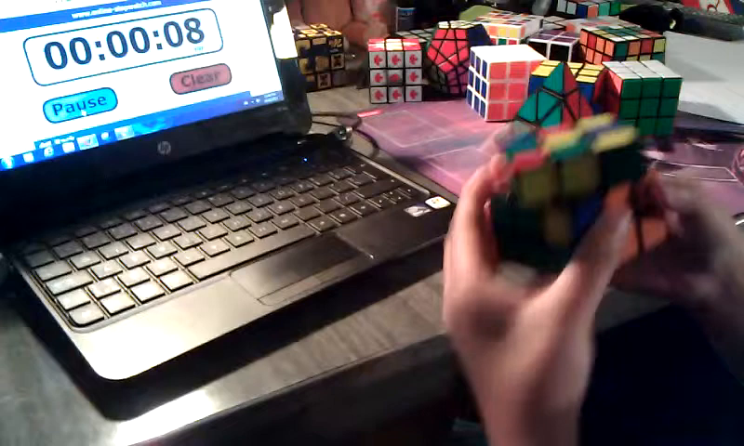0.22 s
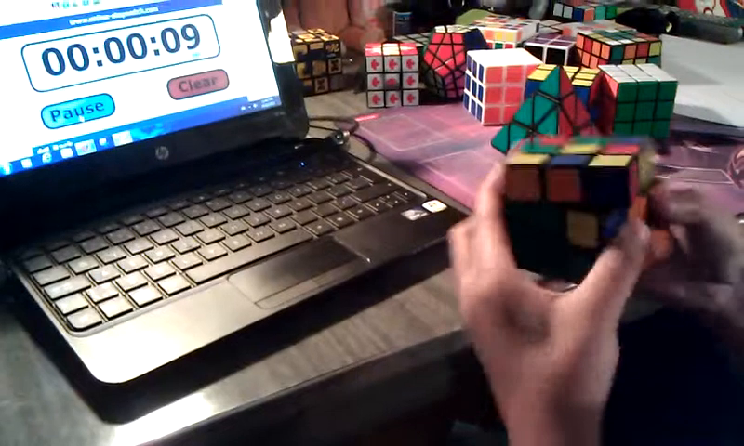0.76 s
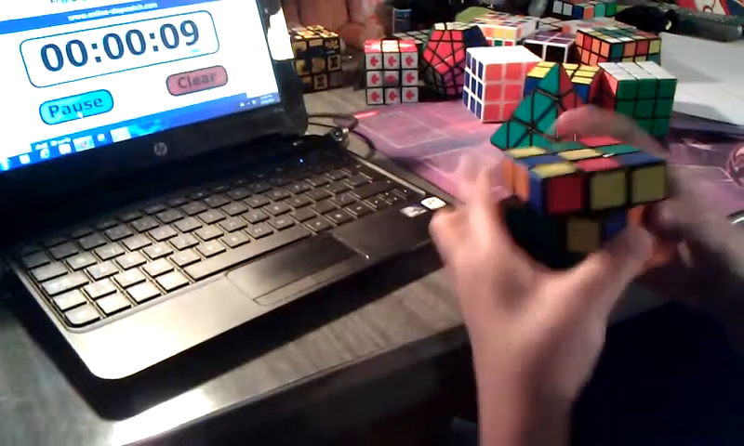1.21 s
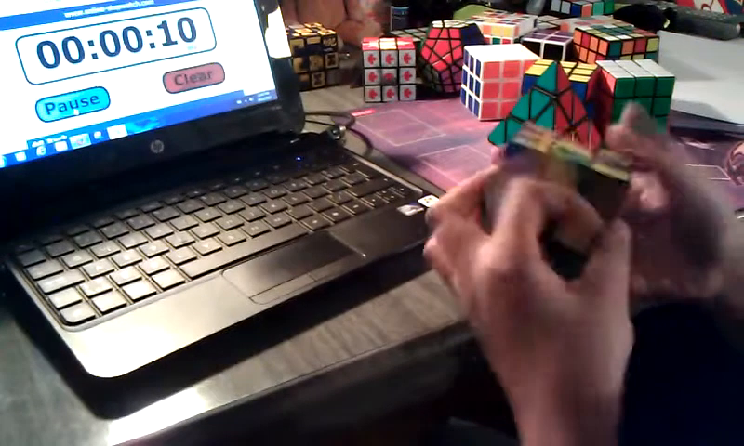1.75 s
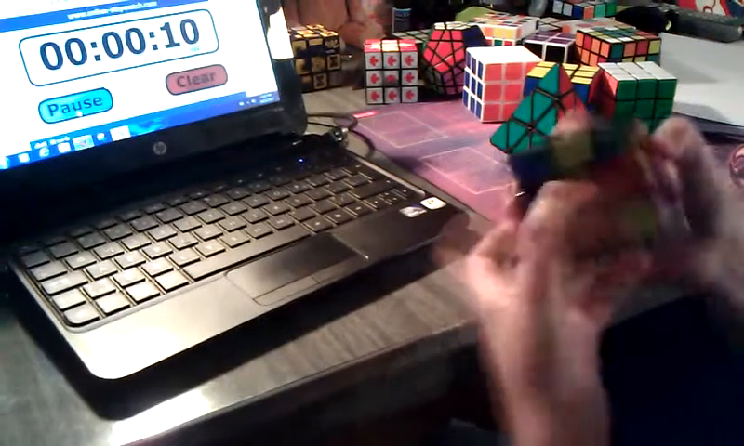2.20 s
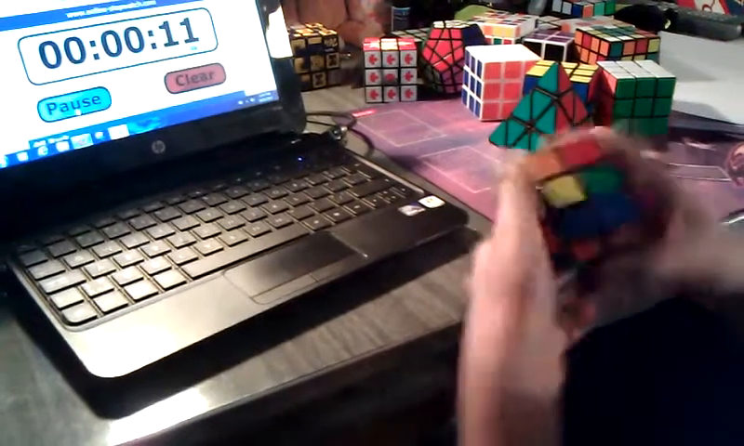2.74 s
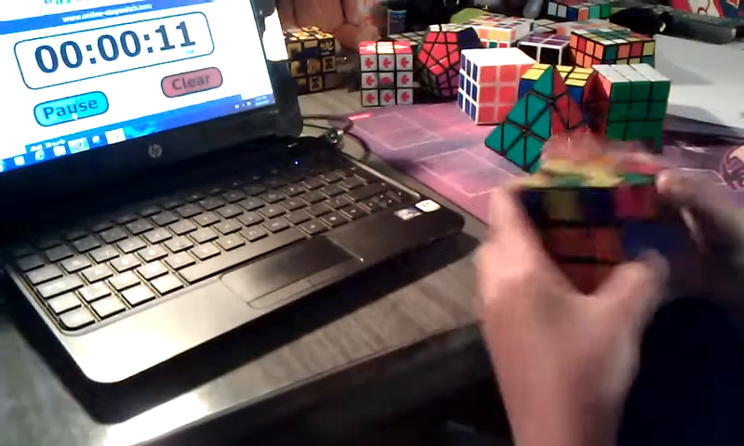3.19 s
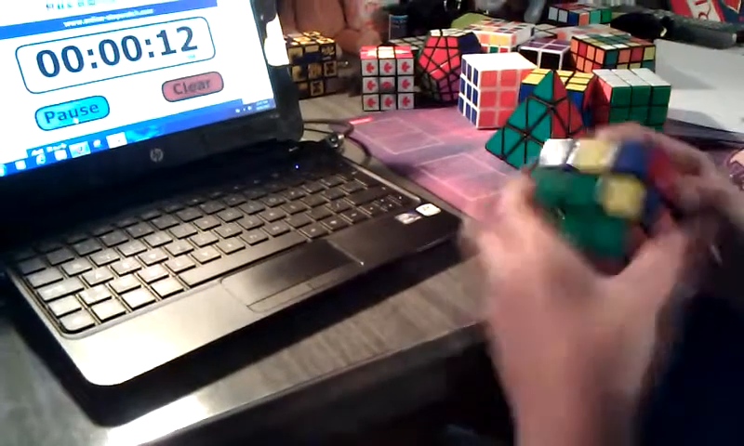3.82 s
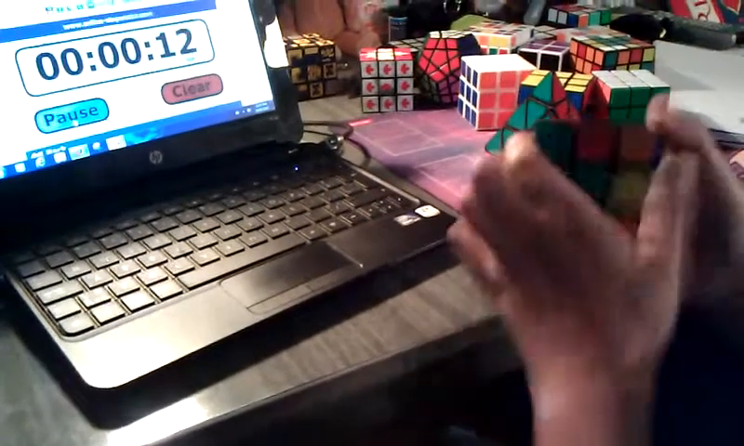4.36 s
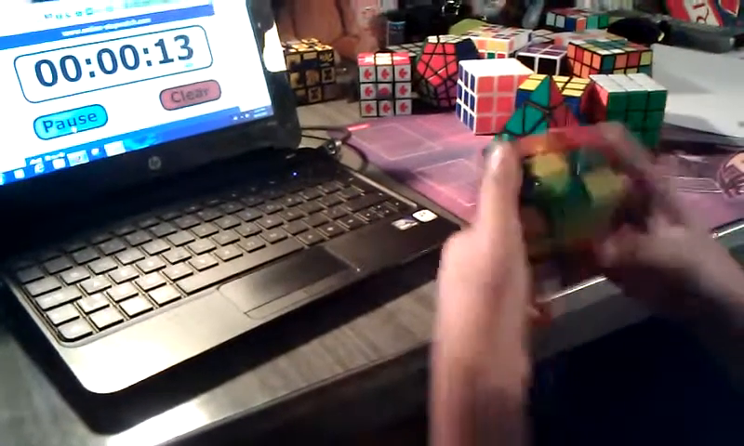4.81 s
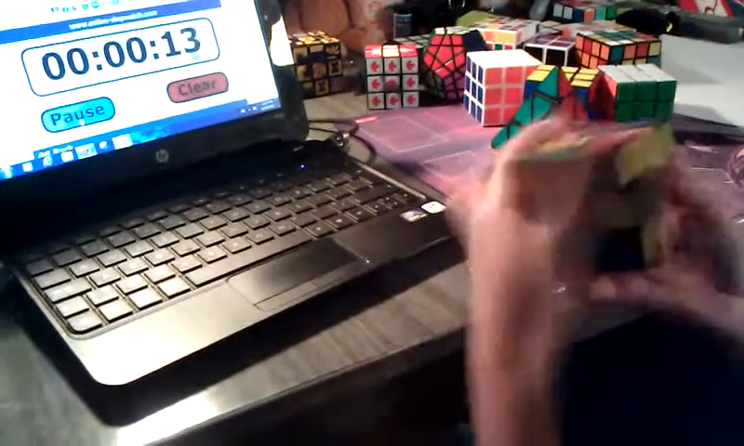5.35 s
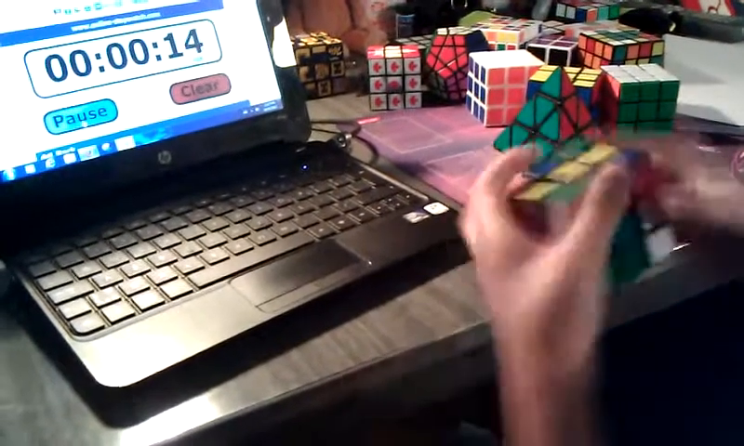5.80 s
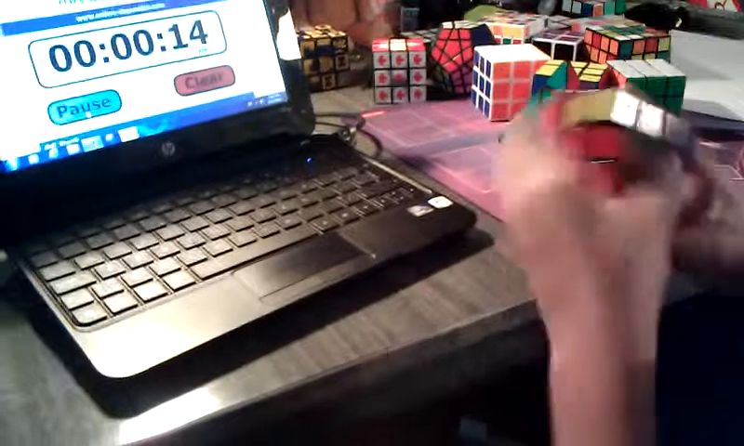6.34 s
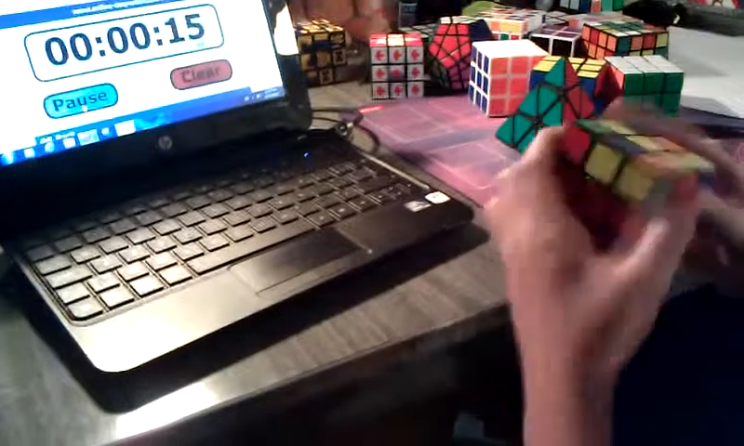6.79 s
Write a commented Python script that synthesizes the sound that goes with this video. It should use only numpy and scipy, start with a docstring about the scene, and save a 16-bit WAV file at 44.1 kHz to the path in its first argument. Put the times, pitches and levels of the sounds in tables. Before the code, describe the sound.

Fast plastic clicks, dry clacks and brief rasping slides come from a twisting puzzle cube, close up indoors over faint steady hiss.

```python
"""Fast clacks, scuffs and ticks over a fine rasp: a plastic puzzle cube turned by hand at a desk in a small room.
Each contact is a burst of force noise that rings the hollow pieces; the rasp is noise made of stick-slip bursts.
Loose pieces tick at random, and one pitched ring stands out at times.
Short echoes, a diffuse room tail and a faint hiss surround the cube. A narrow-band laptop microphone removes the
treble and overloads on the tallest peaks; soft low pulses stand for its overload at a few of the hardest clacks."""
import sys
import numpy as np
from scipy import signal
from scipy.fft import rfft, irfft, next_fast_len
from scipy.io import wavfile

SR = 44100
rng = np.random.default_rng(int(sys.argv[2]) if len(sys.argv) > 2 else 0)


def output_pcm(signal):
    """Save a mono or channel-first signal as 16-bit PCM at the path in sys.argv[1].

    Samples are clipped to [-1, 1] before scaling.
    """
    pcm = np.clip(np.atleast_2d(signal).T, -1, 1) * 32767
    wavfile.write(sys.argv[1], SR, np.round(pcm).astype(np.int16))


N = 311787


def from_db(db):
    """Decibels to amplitude gain."""
    return 10 ** (np.asarray(db) / 20)


def rms_one(x):
    """Scale each row to rms 1."""
    return x / np.sqrt(np.mean(x ** 2, axis=-1, keepdims=True) + 1e-20)


def at_hz(points, hz):
    """Read a spectrum, interpolating on a log-frequency axis."""
    known_hz, values = np.transpose(points)
    return np.interp(np.log(np.maximum(hz, 1)), np.log(known_hz), values)


def coloured(x, spectrum):
    """Filter a noise to a spectrum; rms 1."""
    size = next_fast_len(len(x))
    gain = from_db(at_hz(spectrum, np.fft.rfftfreq(size, 1 / SR)))
    return rms_one(irfft(rfft(x, size) * gain, size)[:len(x)])


def clicks():
    """Pieces snap cleanly against each other: a short scrape, a strong strike, a quick settling."""
    # clean snaps: first touch t/s, relative strength level/dB, hollow lows re peak level/dB
    snaps = [(0.153, -27.5, -24), (0.295, -27.5, -32), (0.386, -30, -33), (0.404, -26, -29),
             (0.48, -28, -30), (0.525, -9.5, -30), (0.533, -8, -40), (0.695, -27.5, -23),
             (0.803, -30.5, -22), (1.055, -30, -22), (1.109, -31.5, -8.5), (1.137, -28, -29),
             (1.255, -21, -40), (1.365, -24.5, -34), (1.393, -19, -19.5), (1.464, -22, -25),
             (1.493, -4.5, -28), (1.51, -6, -32), (1.619, -5.5, -32), (1.758, -10, -28),
             (1.782, -5.5, -24.5), (1.941, -12.5, -22), (1.967, -5, -30), (2.128, -23, -39),
             (2.2, -8.5, -26), (2.211, -8, -21), (2.247, -11.5, -30), (2.317, -23.5, -36),
             (2.379, -30.5, -31), (2.456, -25.5, -34), (2.481, -21.5, -41), (2.553, -22, -19.5),
             (2.623, -12, -30), (2.651, -10.5, -28), (2.697, -14.5, -42), (2.787, -19.5, -18.5),
             (2.837, -25, -33), (2.853, -13.5, -35), (3.011, -16, -25), (3.048, -18, -17.5),
             (3.269, -29.5, -25), (3.394, -25, -23), (3.703, -19.5, -22), (3.719, -17.5, -21),
             (3.946, -17.5, -27), (4.046, -30, -37), (4.133, -16, -27), (4.191, -8, -38),
             (4.346, -20.5, -26), (4.451, -17, -37), (4.477, -18, -31), (4.73, -26.5, -33),
             (4.865, -6, -29.5), (4.947, -24, -35), (5.031, -15, -27), (5.045, -15, -27), (5.142, -7, -34),
             (5.197, -36, -23), (5.218, -16, -24), (5.34, -5.5, -28), (5.549, -26.5, -19),
             (5.719, -24, -28), (5.789, -19, -24.5), (5.993, -8.5, -31), (6.137, -31, -22),
             (6.185, -18, -26.5), (6.253, -21, -31), (6.315, -8.5, -25), (6.332, -14, -47.5),
             (6.649, -25.5, -28.5), (6.889, -33, -19.5)]
    strikes = blows(snaps, seat_s=0.0013, bright_db=0)
    return contacts(strikes, level_db=-20.0, lead_db=-8.0, settle_s=0.0015, strike_db=15)


def scuffs():
    """Pieces catch and grind past each other for some milliseconds, with more scrape around the strike."""
    # grinding catches: first touch t/s, relative strength level/dB, hollow lows re peak level/dB
    grinds = [(0.048, -38, -8), (0.073, -30, -23), (0.545, -12, -35), (0.556, -9, -23),
              (0.589, -14.5, -25.5), (1.009, -35, -17), (1.186, -27.5, -18), (1.342, -18, -20.5),
              (1.429, -25, -28), (1.64, -15, -24), (1.657, -23, -19), (1.724, -10, -26), (1.96, -11.5, -24),
              (1.989, -16, -38), (2.18, -10, -26.5), (2.428, -20.5, -35), (2.87, -14, -46),
              (2.909, -4, -45), (2.986, -20.5, -34), (3.056, -9, -25.5), (3.496, -32, -21),
              (3.737, -18, -26), (4.001, -23.5, -36), (4.158, -23.5, -21), (4.181, -8, -26),
              (4.497, -5.5, -26.5), (4.52, -8.5, -30.5), (4.887, -8.5, -22.5), (4.891, -10, -38),
              (5.02, -16, -33), (5.118, -18.5, -30), (5.31, -16, -27), (5.83, -13, -30), (5.956, -7.5, -26),
              (6.278, -17, -26.5), (6.999, -19.5, -30)]
    strikes = blows(grinds, seat_s=0.0016, bright_db=0)
    return contacts(strikes, level_db=-19.5, lead_db=1, settle_s=0.0031, strike_db=13)


def ticks(pressure):
    """Loose pieces rattle lightly while the layers rub, ringing the same hollow shells."""
    return contacts(rattle(pressure), level_db=-7.0, lead_db=-8.5, settle_s=0.0019, strike_db=14.5)


def blows(table, seat_s, bright_db, plain_lows_db=-25.5, bright_per_db=0.27):
    """A piece strikes home just after first touch, the harder the brighter: rows (s, dB, hollow dB, bright dB)."""
    touch_s, peak_db, lows_db = np.transpose(table)
    highs_db = bright_db + bright_per_db * (peak_db - peak_db.mean())
    hollow_db = lows_db - plain_lows_db  # 0 for a contact that is neither hollow nor thin
    return np.transpose([touch_s + seat_s, peak_db, hollow_db, highs_db])


def rattle(pressure, hollow_db=1, bright_db=-3, colour_spread_db=4.5, count=900):
    """Random ticks follow the rubbing up to what their small weight allows: rows as in blows."""
    ticks_per_s, spread_db, top_db = 80, 2.5, -39
    s = np.cumsum(rng.uniform(0, 2, count)) / ticks_per_s  # uneven gaps
    strength, hollow, bright = rng.standard_normal((count, 3)).T
    rub_db = 20 * np.log10(np.interp(s * SR, np.arange(N), pressure))
    tick_db = np.minimum(rub_db, top_db) + spread_db * np.clip(strength, -2, 2)
    lows_db = hollow_db + colour_spread_db * hollow
    highs_db = bright_db + colour_spread_db * bright
    return np.transpose([s, tick_db, lows_db, highs_db])[s < N / SR]


def contacts(table, level_db, lead_db, settle_s, strike_db, vary_db=1.0, piece_spread=0.029,
             low_hz=1150, high_hz=4750, size=1024):
    """Every contact's force rings all the shell resonances, weighted by its hollow lows and bright highs."""
    # resonances of the hollow plastic pieces: nominal f/Hz, bandwidth f/Hz, relative level/dB
    shell = [(631, 117, -19), (877, 82, -18.5), (1213, 186, -16), (1983, 300, -8), (2616, 205, -7),
             (3344, 170, -9), (3830, 256, -7.5), (4640, 530, -6), (5416, 200, -12), (6358, 495, -2.5),
             (6718, 800, 0), (7492, 930, -3)]
    s, contact_db, hollow_db, bright_db = np.transpose(table)
    offsets = np.arange(size) - size // 4  # samples around the strike
    bins_hz = np.fft.rfftfreq(size, 1 / SR)
    force = rfft(chatter(offsets / SR, lead_db, settle_s, strike_db, count=len(s)))
    strength, detune = rng.standard_normal((len(s), len(shell), 2)).T
    rings = 0
    for k, (hz, width_hz, mode_db) in enumerate(shell):
        colour_db = hollow_db * (hz < low_hz) + bright_db * (hz > high_hz)
        gain = from_db(level_db + contact_db + mode_db + colour_db + vary_db * strength[k])
        # corners, edges and centres ring a little differently
        piece_hz = hz * np.exp(piece_spread * detune[k])
        ring = rms_one(irfft(force * resonance(piece_hz[:, None], width_hz, bins_hz)))
        rings = rings + (-1) ** k * gain[:, None] * ring  # neighbouring modes alternate in sign
    at = np.round(s * SR).astype(int)[:, None] + offsets
    return np.bincount(np.clip(at, 0, N - 1).ravel(), rings.ravel(), N)


def chatter(t, lead_db, settle_s, strike_db, count):
    """Force of each contact: a brief scrape, the strike, then loose pieces rattling to rest."""
    shape = np.where(t < 0, from_db(lead_db), 1) * np.exp(-abs(t) / settle_s)
    force = shape * rng.standard_normal((count, len(t)))
    force[:, np.argmin(abs(t))] += from_db(strike_db)
    return force


def resonance(hz, width_hz, bins_hz):
    """Frequency response of one damped ringing mode (two poles), gain about 1 on top."""
    r = np.exp(-np.pi * width_hz / SR)
    delay = np.exp(-2j * np.pi * bins_hz / SR)  # one sample
    poles = 1 - 2 * r * np.cos(2 * np.pi * hz / SR) * delay + (r * delay) ** 2
    return (1 - r * r) / 2 * (1 - delay ** 2) / poles


def rasp(pressure, level_db=-3.5):
    """Sliding faces give a fine grain, with coarser catches where the seams cross."""
    # colour of the rasp: f/Hz, relative level per Hz/dB
    rasp_colour = [(150, -26.5), (400, -12.5), (700, -1.5), (1000, -2.5), (1850, 5), (2550, 6), (3000, 0),
                   (4300, -2.5), (5500, -2.5), (6600, -3), (8200, -5.5)]
    grain = slips(per_s=1200, length_s=0.00069)
    catches = slips(per_s=110, length_s=0.0012)
    rough = np.sqrt(grain + catches) * rng.standard_normal(N)
    return from_db(level_db) * pressure * coloured(rough, rasp_colour)


def rubbing(ease_s=0.0066, hold_db=-67, turn_swell_db=3.5):
    """How hard the layers rub: swelling through each turn, even during a regrip, faint in between."""
    # a layer is flicked round: start t/s, end t/s, rubbing halfway level/dB
    turns = [(0.5, 0.56, -45), (1.47, 1.515, -41.5), (1.59, 1.78, -37.5), (1.91, 1.995, -31),
             (2.125, 2.28, -39.5), (2.6, 2.685, -38.5), (2.835, 2.925, -27.5), (2.98, 3.07, -42),
             (3.655, 3.75, -47), (4.125, 4.2, -29.5), (4.44, 4.525, -36.5), (4.83, 4.895, -30),
             (5.018, 5.06, -42), (5.11, 5.235, -37.5), (5.305, 5.36, -27.5), (5.77, 5.87, -39),
             (5.948, 6.012, -29.5), (6.25, 6.345, -35)]
    # the fingers shift their grip and the layers creep: start t/s, end t/s, rubbing level/dB
    regrips = [(0.0, 0.185, -53), (0.913, 1.015, -44), (1.04, 1.225, -62), (1.288, 1.45, -47),
               (2.42, 2.6, -50.5), (3.162, 3.45, -55.5), (3.5, 3.6, -50), (4.3, 4.44, -48.5),
               (4.68, 4.83, -51), (5.5, 5.73, -53), (6.18, 6.25, -52), (6.52, 6.555, -60.5)]
    t = np.arange(N) / SR
    pressure = np.full(N, from_db(hold_db))  # the cube merely held
    for moves, swell_db in ((turns, turn_swell_db), (regrips, 0)):
        for start, end, slide_db in moves:
            first, last = from_db([slide_db - swell_db / 2, slide_db + swell_db / 2])
            corners_s = [start - ease_s, start + ease_s, end - ease_s, end + ease_s]
            pressure += np.interp(t, corners_s, [0, first, last, 0])
    return pressure


def slips(per_s, length_s):
    """Power of tiny stick-slip bursts of uneven size at random moments; mean 1."""
    sizes = from_db(4 * np.minimum(rng.exponential(1, N), 2.5))
    born = (rng.random(N) < per_s / SR) * sizes ** 2
    power = signal.lfilter([1], [1, -np.exp(-2 / (length_s * SR))], born + 1e-18)
    return power / power.mean()


def pings(hz=2570, decay_s=0.0038):
    """A loose piece rings on with one clear pitch: a decaying sine."""
    # pitched rings: t/s, starting level/dB
    strikes = [(.1526, -37), (.482, -34), (0.8031, -33.5), (1.257, -30.5), (4.222, -20.5)]
    t = np.arange(SR // 20) / SR
    taps = np.zeros(N)
    for s, db in strikes:
        taps[round(s * SR)] = from_db(db)
    return signal.fftconvolve(taps, np.sin(2 * np.pi * hz * t) * np.exp(-t / decay_s))[:N]


def reflections(x, level_db=-12, decay_s=0.0078, gap_s=0.0034, count=3, change_s=0.11):
    """Echoes off desk, screen and near walls; patterns crossfade in a cycle as the hands move the cube about."""
    t = np.arange(SR // 10) / SR
    shape = np.clip(t / gap_s - 0.5, 0, 1) * np.exp(-t / decay_s)
    place = np.arange(N) / SR / change_s
    out = 0
    for k in range(count):
        # cyclic distance from pattern k; silent from 1 on
        away = np.minimum(abs((place - k + count / 2) % count - count / 2), 1)
        response = rms_one(shape * rng.standard_normal(len(t))) / np.sqrt(len(t))
        out = out + signal.fftconvolve(x * np.cos(np.pi / 2 * away), response)[:N]
    return from_db(level_db) * out


def room(x, tail_db=-10.0, t60=0.28, build_s=0.00071, count=13):
    """The room's diffuse tail: in each band, noise that carries the stored energy."""
    # how strongly the room answers: f/Hz, relative level/dB
    walls = [(300, -3.5), (700, 1), (1500, -1.5), (2500, 1.5), (4000, 0.5), (5500, -3.5), (7000, 0.5),
             (8500, -7)]
    edges = np.linspace(np.sqrt(250), np.sqrt(9000), count + 1) ** 2  # band edges, Hz
    out = 0
    for low, high in zip(edges, edges[1:]):
        band = signal.butter(3, [low, high], "band", fs=SR, output="sos")
        stored = fade(signal.sosfilt(band, x + 1e-12) ** 2, t60 / np.log(10 ** 6), build_s)
        diffuse = rms_one(signal.sosfilt(band, rng.standard_normal(N)))
        gain = from_db(tail_db + at_hz(walls, np.sqrt(low * high)))
        out = out + gain * np.sqrt(stored) * diffuse
    return out


def fade(power, decay_s, build_s):
    """Sound energy builds up between the surfaces and leaks away."""
    for seconds in (decay_s, build_s):
        keep = np.exp(-1 / (seconds * SR))
        power = signal.lfilter([1 - keep], [1, -keep], power + 1e-18)
    return power


def overload_thumps(width_s=0.00046):
    """The overloading recorder adds a soft low thump, a bell-shaped pulse, at a few of the hardest clacks."""
    # overload pulses, at set times: pulse centre t/s, pulse peak level/dB
    pulses = [(1.62, -38), (2.910, -36), (5.341, -41.5)]
    t = np.arange(N) / SR
    return sum(from_db(db) * np.exp(-np.minimum(((t - s) / width_s) ** 2, 50)) for s, db in pulses)


def hiss(level_db=-58):
    """Steady room and microphone noise: coloured noise."""
    # colour of the hiss: f/Hz, relative level per Hz/dB
    hiss_colour = [(30, -20), (85, -25.5), (140, -18.5), (210, -8.5), (310, -1.5), (600, -4), (800, -7.5),
                   (1500, -8.5), (2500, -15), (4400, -20), (5600, -39), (7500, -22.5), (8500, -19.5)]
    return from_db(level_db) * coloured(rng.standard_normal(N), hiss_colour)


def scene():
    """The cube in its room, thinned in the bass, with the recorder's overload thumps and the steady hiss added."""
    pressure = rubbing()
    cube = clicks() + scuffs() + ticks(pressure) + pings() + rasp(pressure)
    bass_cut = signal.butter(2, 260, "high", fs=SR, output="sos")
    heard = signal.sosfilt(bass_cut, cube + reflections(cube) + room(cube))
    return (heard + overload_thumps() + hiss())[None]


def record(dry, mic_top_hz=8288, overload=0.46, cutoff_hz=16200):
    """The microphone cuts the high treble; the tallest peaks then flatten and splash back into it."""
    mic_band = signal.cheby1(12, 0.1, mic_top_hz, fs=SR, output="sos")
    narrow = signal.sosfilt(mic_band, dry)
    excess = narrow - np.clip(narrow, -overload, overload)
    # the overload is a crackle with little bass
    crackle = signal.sosfilt(signal.butter(1, 400, "high", fs=SR, output="sos"), excess)
    flattened = narrow - crackle
    return signal.sosfilt(signal.ellip(10, 0.1, 80, cutoff_hz, fs=SR, output="sos"), flattened)


dry = scene()
out = record(dry)
output_pcm(out)
```